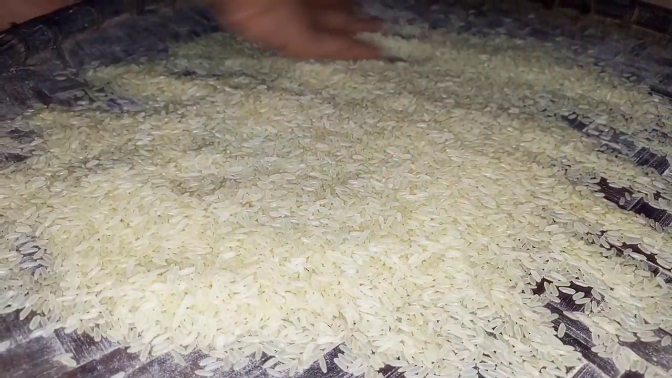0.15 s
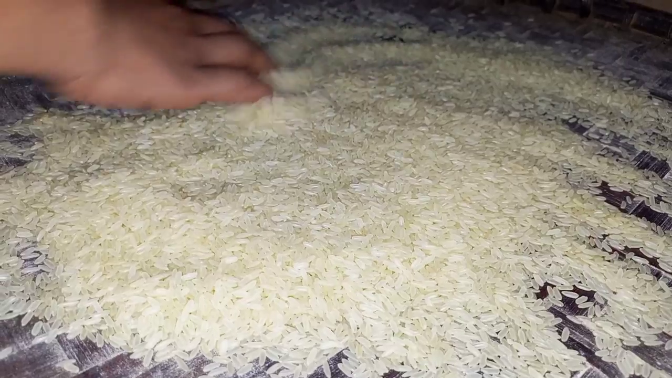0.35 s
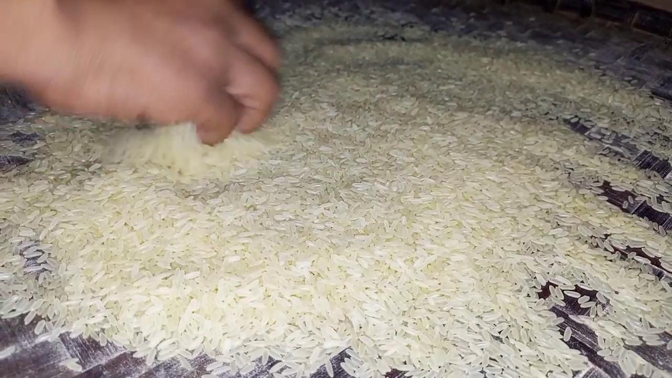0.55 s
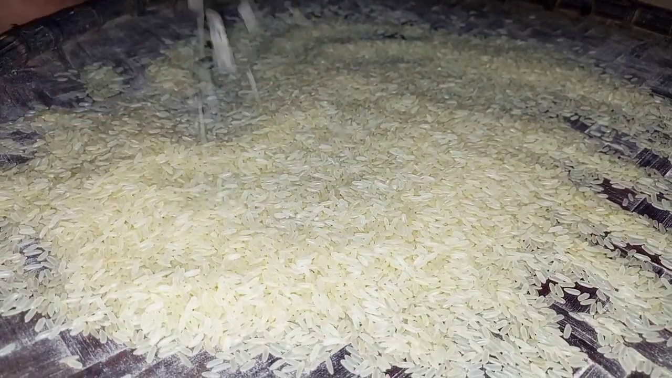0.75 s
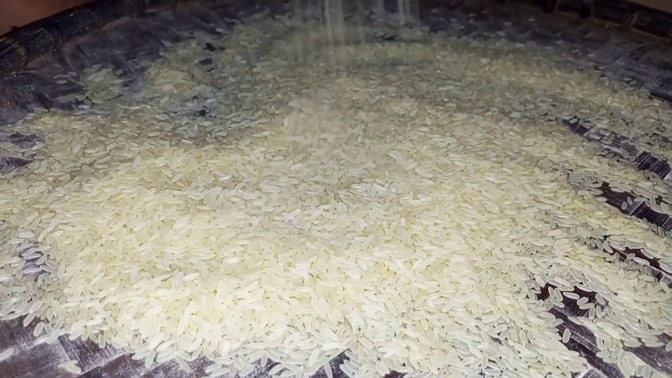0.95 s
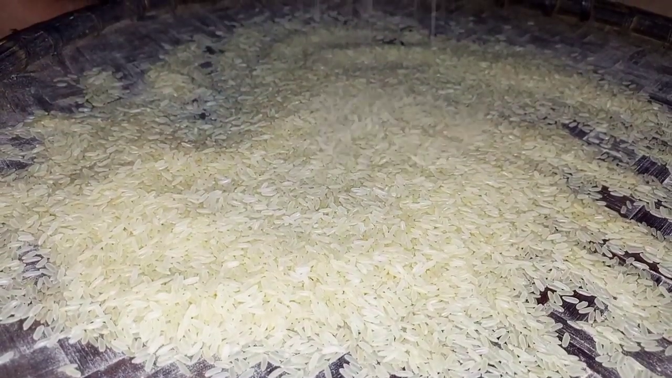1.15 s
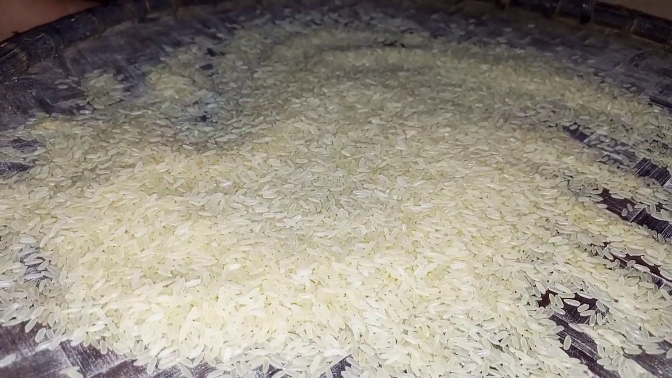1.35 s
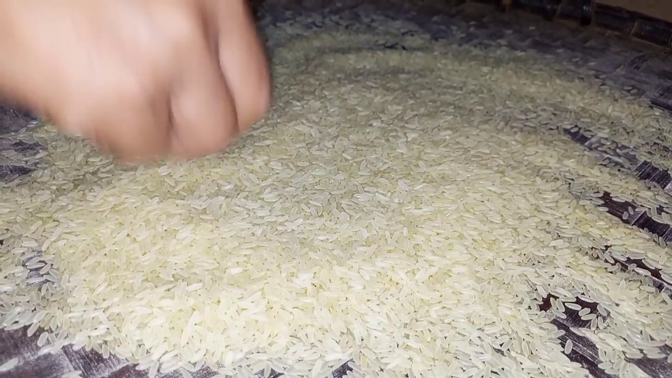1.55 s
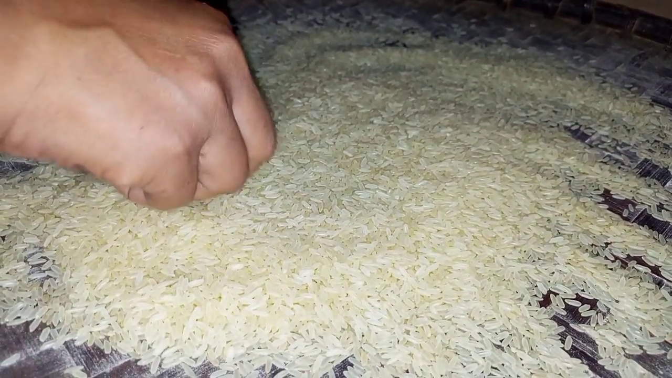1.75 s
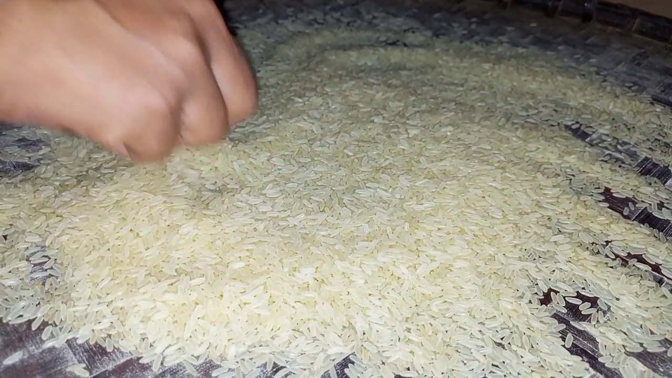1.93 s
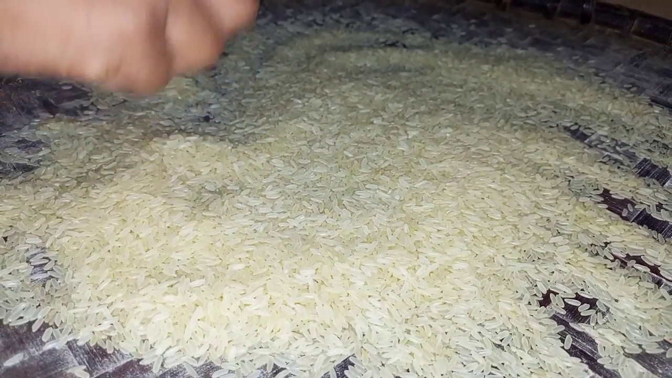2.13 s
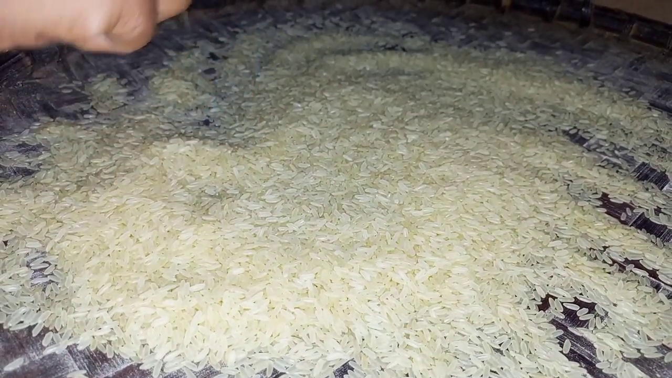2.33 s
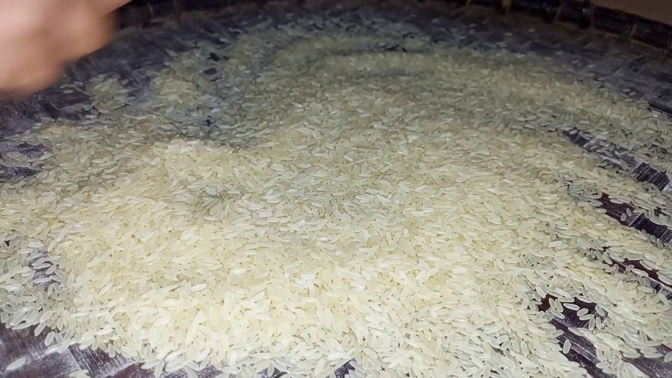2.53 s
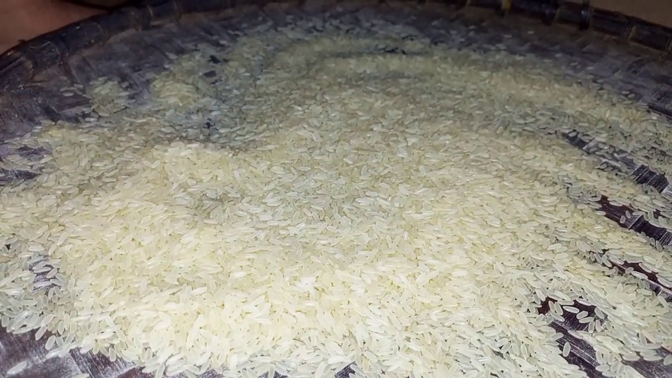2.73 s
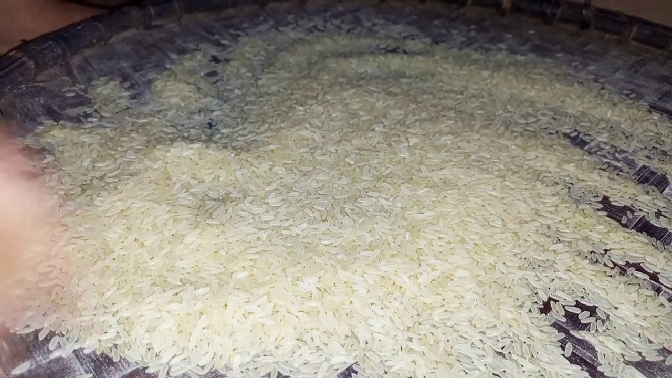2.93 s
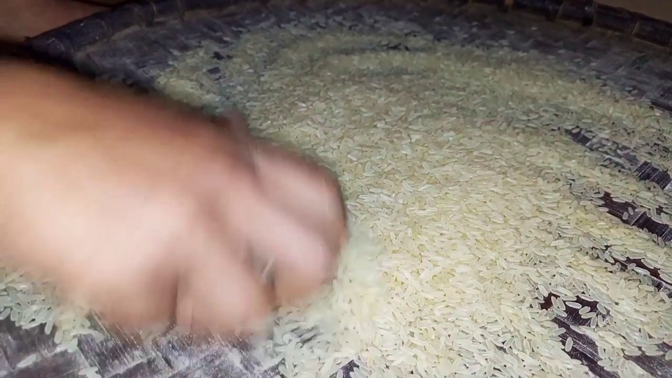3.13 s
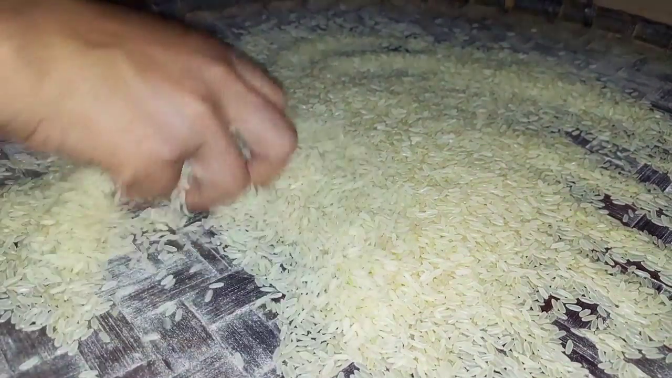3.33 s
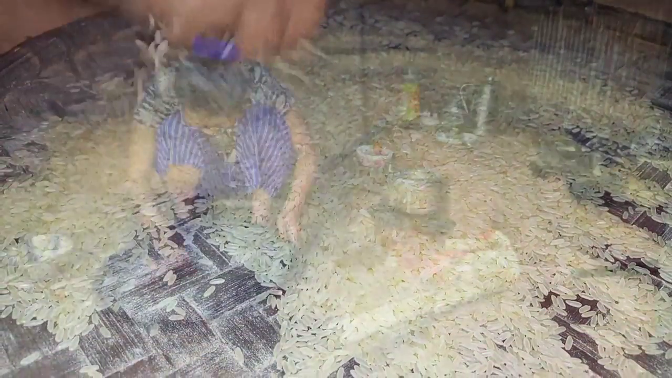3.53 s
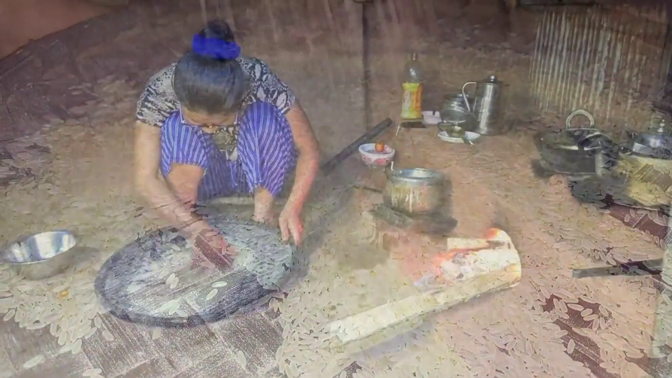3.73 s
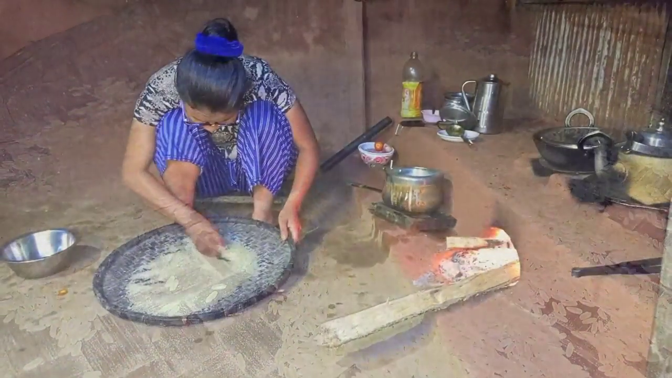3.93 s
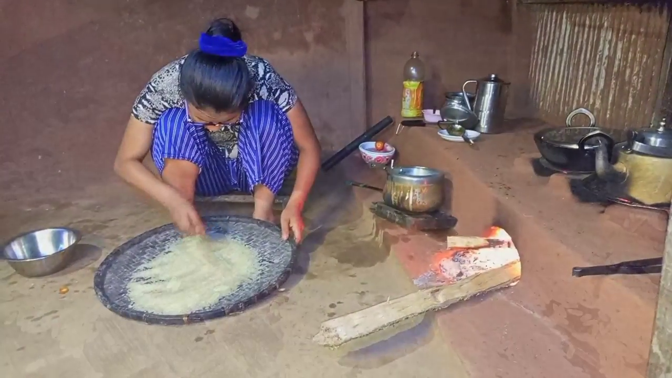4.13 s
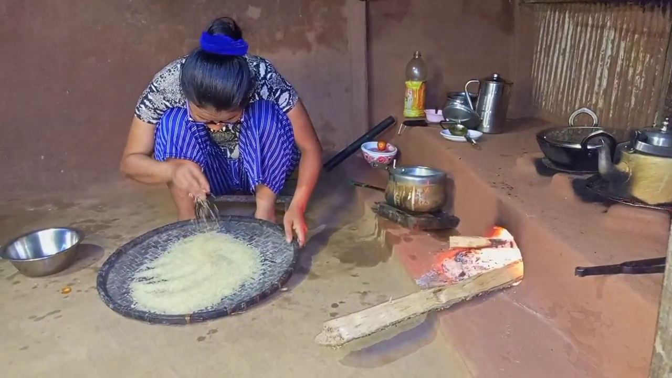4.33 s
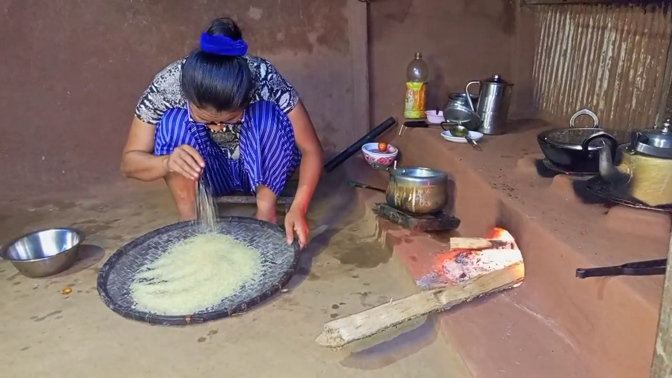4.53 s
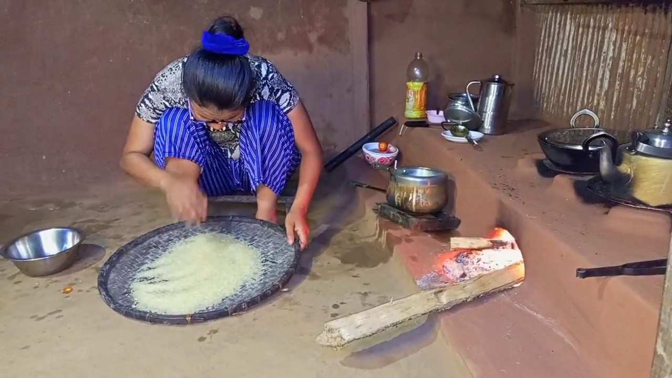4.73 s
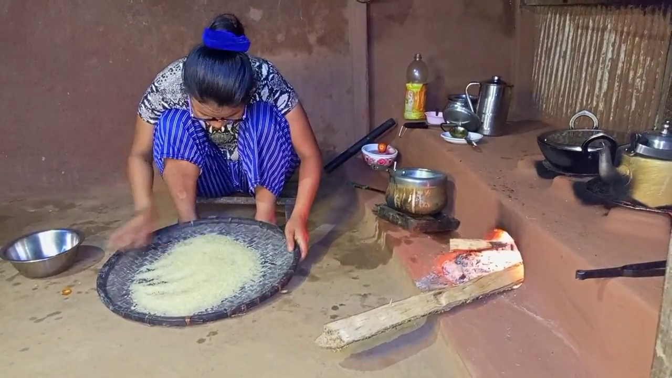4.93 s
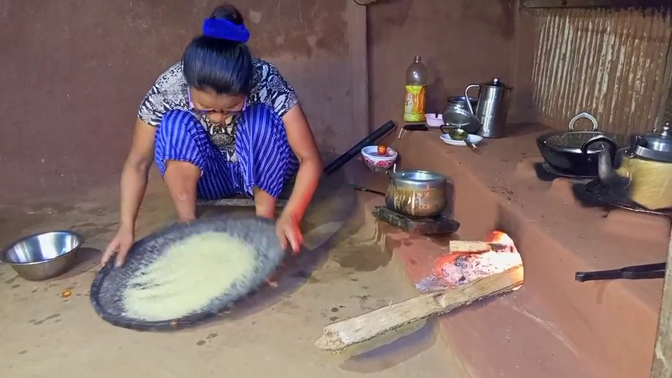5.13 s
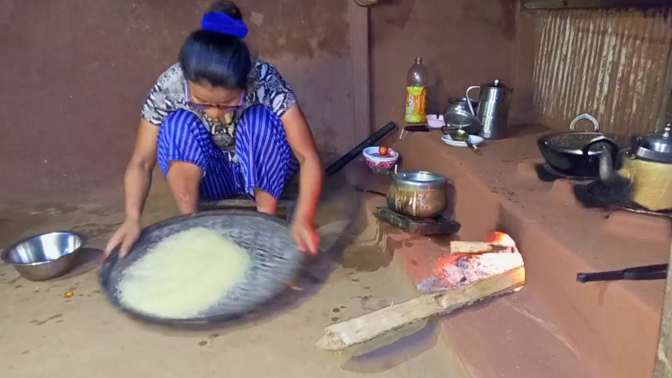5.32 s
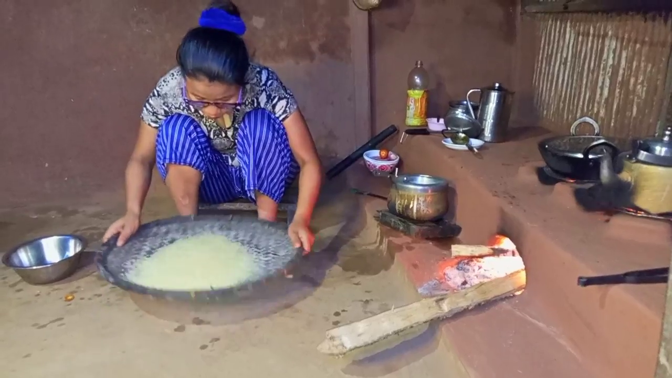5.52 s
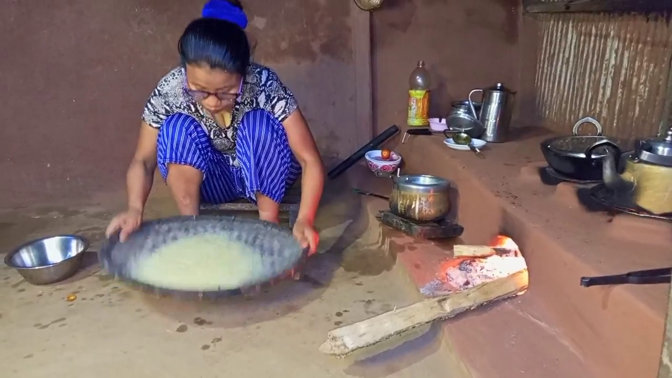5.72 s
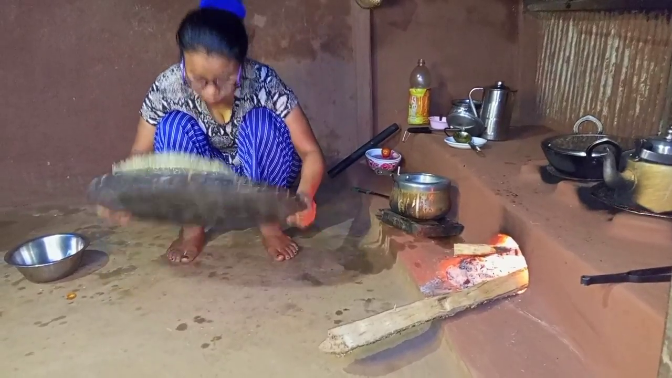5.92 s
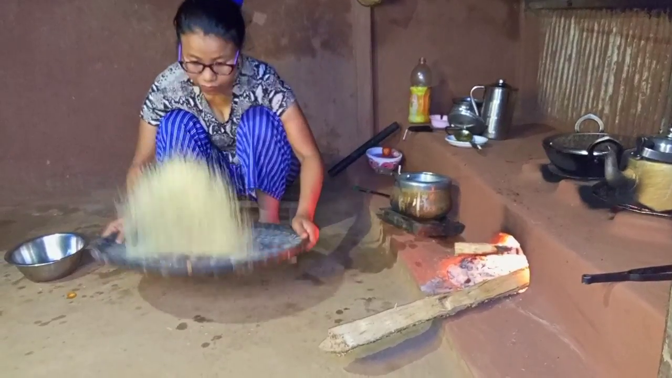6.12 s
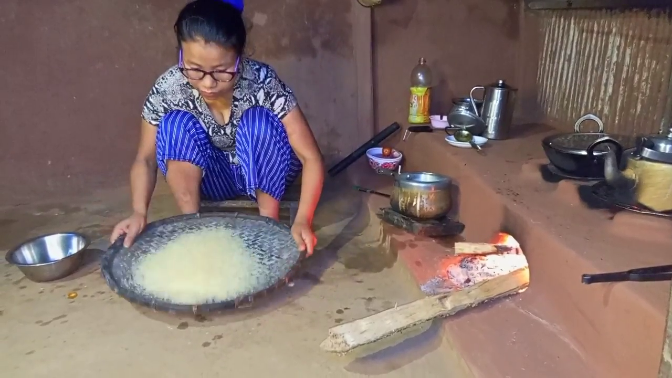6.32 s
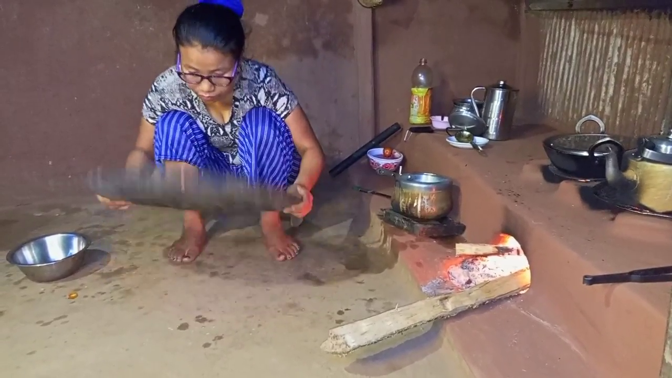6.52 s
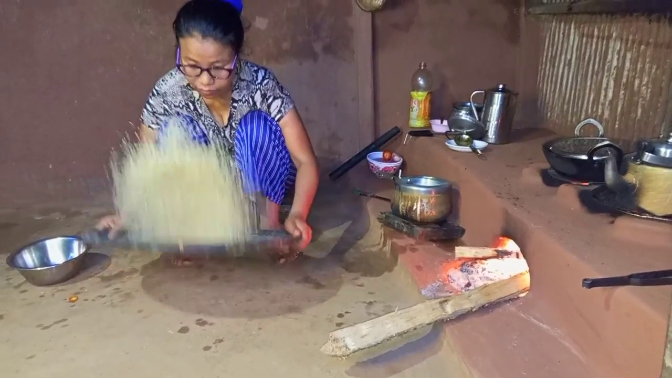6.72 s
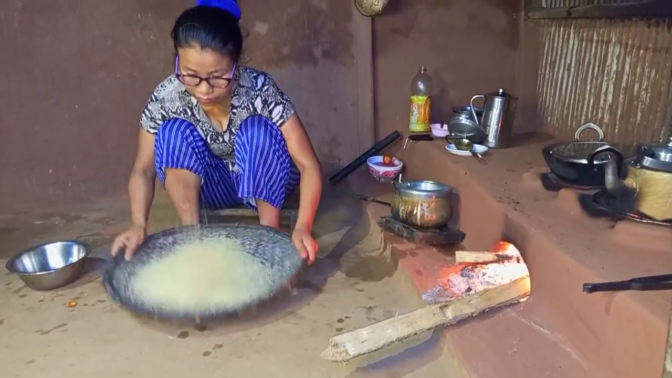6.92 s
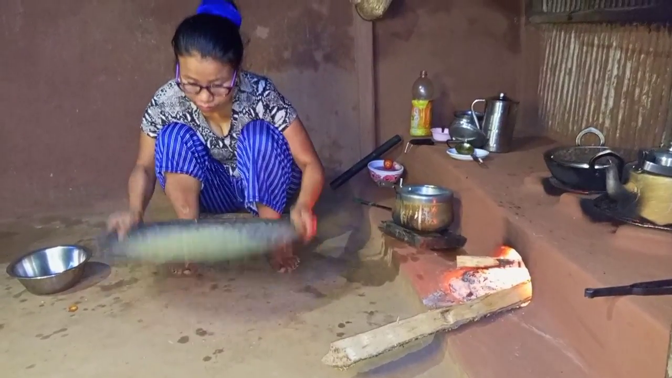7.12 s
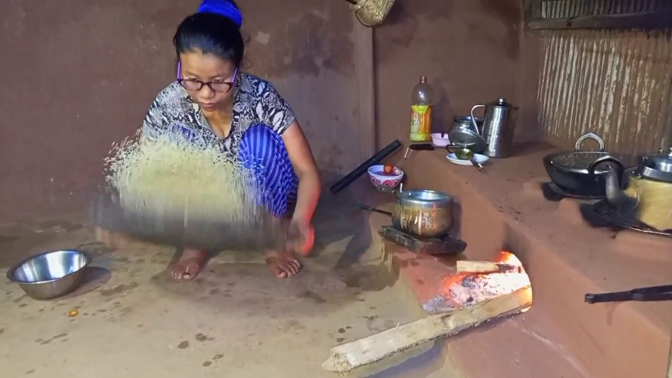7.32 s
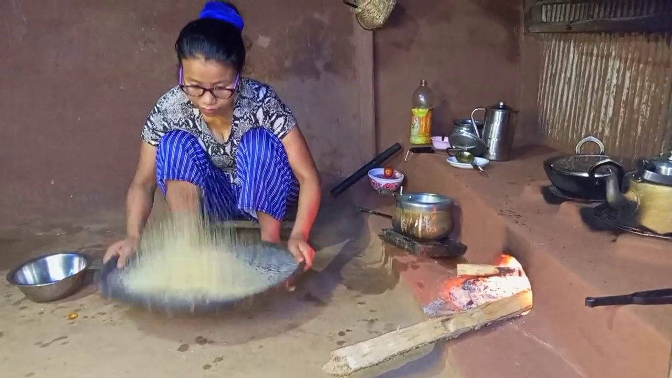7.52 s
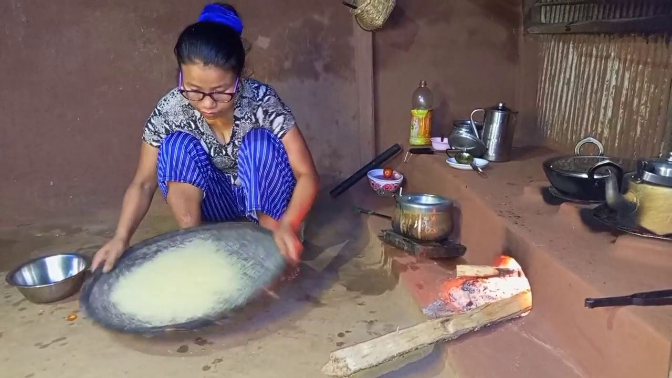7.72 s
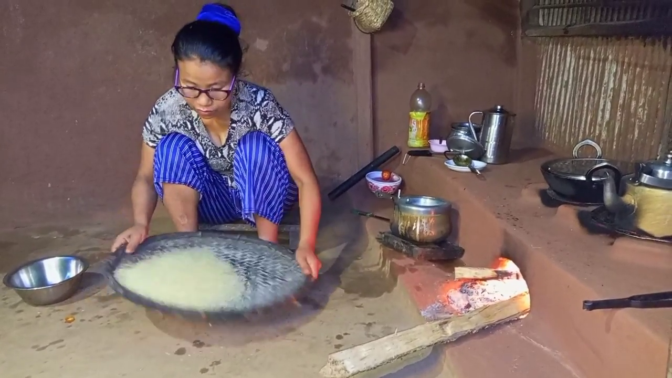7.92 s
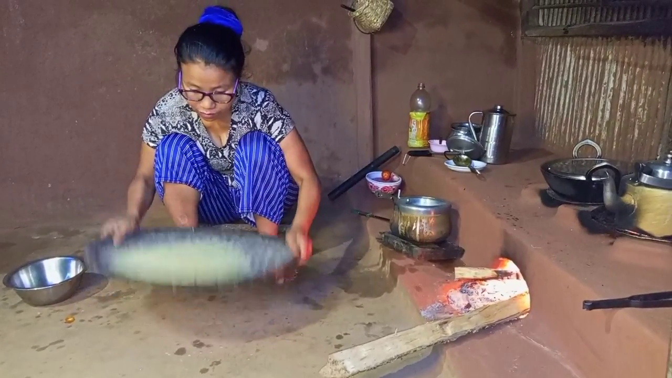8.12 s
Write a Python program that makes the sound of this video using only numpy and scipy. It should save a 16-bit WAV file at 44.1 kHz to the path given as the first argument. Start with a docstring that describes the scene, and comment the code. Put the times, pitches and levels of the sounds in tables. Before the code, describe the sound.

A hand scoops and stirs dry rice on a bamboo tray, then the grains slide and land in three bright showers in a quiet kitchen.

```python
"""Raw rice on a woven bamboo winnowing tray, in a quiet kitchen. Close up, a hand scoops the grains
and lets them trickle back. From a few steps away it stirs them and pours a fistful; then the tray is
rocked and the rice is tossed and caught three times. Each movement is a swarm of tiny clicks and pings,
coloured by heap and bamboo, that thickens as it gets louder. Single grains tick on the weave,
over faint hollow bumps and steady room tone."""
import sys
import numpy as np
from scipy import signal
from scipy.fft import rfft, irfft, next_fast_len
from scipy.io import wavfile

SR = 44100
rng = np.random.default_rng(int(sys.argv[2]) if len(sys.argv) > 2 else 0)


def generate_wav(signal):
    """Clip the signal to [-1, 1] and save it as 16-bit WAV at the path in sys.argv[1]."""
    frames = np.transpose(np.atleast_2d(signal))
    scaled = np.clip(frames, -1, 1) * 32767
    pcm = np.round(scaled).astype(np.int16)
    wavfile.write(sys.argv[1], SR, pcm)


N = 359856
TAPS = 4096
HZ = np.fft.rfftfreq(TAPS, 1 / SR)
TIME = np.arange(N) / SR
MOVE_S = 3.9  # the perspective shifts from close up to a few steps away
RELEASE_DB = 32  # drop of a rustle over its release time

# resonances of tray and microphone (hollow low ring, bright high peaks),
# close up and from a few steps away: centre_hz, width_hz, gain_db
NEAR_RESONANCES = [(420.0, 80.0, 5.9), (570.0, 100.0, 7.2), (840.0, 250.0, 14.4), (1240.0, 110.0, 7.1),
                   (1950.0, 880.0, 5.6), (5730.0, 2200.0, 20.4), (9210.0, 1760.0, 11.6),
                   (14900.0, 1110.0, 8.7)]
FAR_RESONANCES = [(370.0, 110.0, 4.4), (590.0, 80.0, 4.5), (1290.0, 110.0, 2.0), (1800.0, 230.0, 1.8),
                  (2540.0, 550.0, 5.3), (6380.0, 1300.0, 9.7), (9430.0, 2540.0, 6.3),
                  (15040.0, 1550.0, 11.9)]
# tone of one grain contact when trickling, stirred or landing: frequency_hz, gain_db
TRICKLE_EQ = [(100, -47), (250, -25), (480, -26), (750, -20.5), (1500, -1), (3000, -1.5), (4500, -16),
              (7700, -20), (11000, -12.5), (13500, -19.5), (15500, -14)]
STIR_EQ = [(100, -47), (250, -22.3), (480, -28.1), (650, -7.5), (1500, 0.0), (3000, -0.7), (4500, -1.3),
           (7700, -7.0), (11000, -7.6), (13500, -16.0), (15500, -12.1)]
LANDING_EQ = [(100, -51), (250, -25), (350, -9.5), (620, -9), (950, -12), (2500, -2), (4500, 0.5),
              (7700, -5.5), (11000, -5.5), (13500, -8.5), (15500, -10)]
# narrow modes of the lifted tray: centre_hz, width_hz, gain_db
LIFTED_MODES = [(587, 24, 5), (791, 15, 6), (1060, 36, 4), (1285, 21, 1.5)]


def amp(db):
    """Decibels to gain."""
    return 10 ** (np.asarray(db) / 20)


def unit_rms(x):
    """Scales to rms 1."""
    return x / np.sqrt(np.mean(x ** 2) + 1e-20)


def add(mix, start_s, sound):
    """Mixes a sound in at start_s."""
    part = mix[max(round(start_s * SR), 0):][:len(sound)]
    part += sound[:len(part)]


def eq_db(colour, peaks):
    """A smooth EQ curve with resonances on top, in dB over HZ."""
    hz, db = np.transpose(colour)
    slope = np.interp(np.log(HZ + 1), np.log(hz), db)
    return slope + sum(gain / (1 + (2 * (HZ - centre) / width) ** 2) for centre, width, gain in peaks)


def focus_db(hz, octaves):
    """A broad band-pass curve centred on hz."""
    return -12 * np.log10(1 + (np.log2((HZ + 1) / hz) / octaves) ** 4)


def coloured(x, curve_db):
    """Plays x through a minimum-phase EQ, so clicks keep their sharp attack."""
    log_gain = np.log(amp(np.r_[curve_db, curve_db[-2:0:-1]]))
    impulse = np.fft.ifft(np.exp(np.conj(signal.hilbert(log_gain)))).real[:TAPS // 2]
    return signal.fftconvolve(x, impulse)[:len(x)]


def split(x, hz, order=12):
    """Crossover: the parts of x below and above hz."""
    size = next_fast_len(len(x) + TAPS)
    rolloff = 1 + (np.fft.rfftfreq(size, 1 / SR) / hz) ** order
    below = irfft(rfft(x, size) / rolloff, size)[:len(x)]
    return below, x - below


def waver(t, rate_hz, order=4):
    """A smooth random modulator with rms 1."""
    return unit_rms(split(rng.standard_normal(len(t)), rate_hz, order)[0])


def contacts(t, chance):
    """Clicks of random strength, with the given chance per sample."""
    return rng.standard_normal(len(t)) * (rng.random(len(t)) < chance)


def room(x, wet_db, t60_s=0.11):
    """Adds sparse echoes from the earthen floor and walls."""
    t = TIME[:SR // 4]
    echoes = rng.choice([-1., 1.], len(t)) * (rng.random(len(t)) < .06)
    echoes *= amp(-60 * t / t60_s) * (t > .002)
    echoes *= amp(wet_db) / np.linalg.norm(echoes)
    echoes[0] = 1
    return signal.fftconvolve(x, echoes)


def room_tone(colour, level_db, flutter_db):
    """Steady kitchen air; its rumble, whine and hiss each waver on their own."""
    # whining resonances in the air: centre_hz, width_hz, gain_db
    whine_peaks = [(1233, 88, 10.2), (2422, 144, 14.6), (15200, 1400, 9.2)]
    noise = coloured(rng.standard_normal(N + TAPS), eq_db(colour, whine_peaks))[TAPS:]
    rumble, upper = split(unit_rms(noise), 700)
    whine, hiss = split(upper, 3200)
    out = np.zeros(N)
    for band, depth_db, rate_hz in [(rumble, 2 * flutter_db, 7), (whine, 1.5, 6), (hiss, flutter_db, 20)]:
        out += band * amp(level_db + depth_db * waver(TIME, rate_hz))
    return out


def kitchen(crossfade_s=0.47):
    """The room tone crossfades from beside the tray to a few steps away."""
    # tone of the air at each place: frequency_hz, gain_db
    near_eq = [(40, -18), (90, -10), (170, -2), (270, -10.5), (410, -4.5), (600, -17.5), (1600, -16.5),
               (3000, -13.5), (4000, -13.5), (5300, -1.5), (6800, -16.5), (9500, -19), (13000, -34.5),
               (15500, -27)]
    far_eq = [(40, -13), (90, -4.5), (170, -2.5), (270, -2.5), (410, -6.5), (600, -12), (1600, -15),
              (3000, -1.5), (4000, -9.5), (5300, -3.5), (6800, -3.5), (9500, -8.5), (13000, -20),
              (15500, -23)]
    near = room_tone(near_eq, level_db=-66.5, flutter_db=0.4)
    far = room_tone(far_eq, level_db=-65.5, flutter_db=0.74)
    away = np.clip((TIME - MOVE_S) / crossfade_s + .5, 0, 1)
    return (1 - away) * near + away * far


def bumps():
    """Soft, low, hollow tones that swell and fade with an unsteady pitch."""
    # faint bumps and hums: centre_s, peak_db, pitch_hz, length_s
    hums = [(0.453, -57, 402, 0.17), (1.571, -67, 495, 0.082), (1.69, -66, 169, 0.075),
            (4.3, -65, 615, 0.17), (4.53, -67, 207, 0.17), (4.92, -68, 240, 0.11), (5.14, -63, 153, 0.16),
            (5.24, -59.5, 169, 0.064), (5.6, -65, 159, 0.15), (5.78, -68.5, 163.5, .14),
            (6.58, -70, 158, 0.16)]
    out = np.zeros(N)
    for centre, db, hz, length in hums:
        t = np.arange(0, length, 1 / SR)
        pitch_hz = hz * (1 + 0.038 * waver(t, 32))
        tone = np.sin(2 * np.pi * np.cumsum(pitch_hz) / SR)
        add(out, centre - length / 2, amp(db) * np.hanning(len(t)) * tone)
    return out


def ticks(trim_db=-20.5, bounce=0.62, bounce_s=0.0047, snap_lift_db=6.0):
    """A grain strikes the weave, rings one bamboo strip and chatters for a few milliseconds."""
    # single grains and clumps hitting the tray: start_s, level_db, pitch_hz, snap_db
    hits = [(0.907, -46, 1780, -18), (0.993, -36, 1770, -23), (1.016, -31.5, 2030, -12),
            (1.088, -39, 2020, -20), (1.101, -29, 1640, -26), (1.138, -30.5, 1620, -11),
            (1.302, -23, 1890, -13.5), (1.34, -26.5, 1490, -16), (1.402, -33, 1640, -14),
            (1.885, -44, 2040, -11), (2.554, -30, 1760, -29), (3.306, -15.5, 1100, -16),
            (3.376, -18.5, 1110, -15), (3.633, -23.5, 1800, -11.5), (3.672, -27, 1730, -10.5),
            (3.734, -26, 1690, -22), (3.779, -32.5, 2340, -23), (3.82, -31, 1250, -18),
            (3.91, -29.5, 1300, -5.5), (4.518, -46, 2490, -3), (4.557, -41, 1700, 0),
            (4.589, -44, 2390, -21), (5.224, -39, 2970, -25), (5.819, -49, 2920, -16),
            (7.305, -47, 3300, -4)]
    # modes of a struck bamboo strip: pitch_ratio, width_hz, gain_db
    strip_modes = [(1, 300, 13), (1.33, 300, 5), (1.54, 280, 0), (3.15, 600, 11)]
    out, t = np.zeros(N), TIME[:SR // 50]
    for start, db, hz, snap_db in hits:
        clicks = bounce * contacts(t, .08) * np.exp(-t / bounce_s)
        clicks[0] = 1  # the first impact
        strip = [(ratio * hz, width, gain) for ratio, width, gain in strip_modes]
        resonances = NEAR_RESONANCES if start < MOVE_S else FAR_RESONANCES
        colour_db = eq_db(TRICKLE_EQ, [*resonances, *strip])
        knock = coloured(clicks, colour_db + focus_db(1.1 * hz, octaves=1.2))
        snap = split(coloured(clicks, colour_db), 7500)[1]
        tick = unit_rms(knock) + unit_rms(snap) * amp(snap_db + snap_lift_db)
        add(out, start, room(amp(db + trim_db) * tick, wet_db=-5.5))
    return out


def pings(t, per_s, ring_s, low_hz=700, high_hz=15500):
    """Loose grains bounce on the bamboo; each rings briefly at its own pitch."""
    age = TIME[:SR // 45]
    count = max(int(per_s * t[-1]), 1)
    when, pitch, force, sign = rng.random((6000, 4))[:count].T[:, :, None]
    hz = low_hz * (high_hz / low_hz) ** pitch
    strength = np.sign(sign - .5) * np.sqrt(-hz * np.log(force))
    rings = strength * np.sin(2 * np.pi * hz * age) * np.exp(-age / ring_s)
    places = (when * len(t)).astype(int) + np.arange(len(age))
    return np.bincount(places.ravel(), rings.ravel())[:len(t)]


def movement(attack_s, hold_s, release_s, swell_db, onset_db, body_lag_s, curve,
             body_follow, fizz_follow, fizz_lead_s=0):
    """Rustle, body and fizz envelopes in dB; the weight of the heap follows the first loose grains."""
    t = np.arange(0, hold_s + 1.4 * release_s, 1 / SR)
    swell = swell_db * np.minimum(t / hold_s - 1, 0)
    rise, body_rise = (-onset_db * np.exp(-np.maximum(t - lag, 0) / attack_s) for lag in (0, body_lag_s))
    fall, fizz_fall = (-RELEASE_DB * (np.maximum(t - end, 0) / release_s) ** curve
                       for end in (hold_s, hold_s - fizz_lead_s))
    rustle = rise + swell + fall
    body = body_rise + body_follow * (swell + fall)
    fizz = rise + fizz_follow * (swell + fizz_fall)
    return rustle, body, fizz


def rice(envelopes, levels_db, colour, peaks, clicks_per_s, pings_per_s, ping_db, ring_s,
         clump_db, weight, full_db, wet_db):
    """Colliding grains, denser when louder: body of heap and tray, rustle of grains, fizz of husks."""
    rustle_db, body_db, fizz_db = (envelope + db for envelope, db in zip(envelopes, levels_db))
    t = TIME[:len(rustle_db)]
    density = amp(np.maximum(envelopes[0], -RELEASE_DB) / 2)
    chance = np.minimum(clicks_per_s / SR * density, 1)
    grains = contacts(t, chance) / np.sqrt(chance)
    grains += amp(ping_db) * unit_rms(pings(t, pings_per_s, ring_s))
    # grains give way in small clumps, a few milliseconds each
    grains *= amp(clump_db * waver(t, 90, order=2))
    sound = room(coloured(grains, eq_db(colour, peaks)), wet_db)[:len(t)]
    body, upper = split(sound, 1300, order=24)
    rustle, fizz = split(upper, 7500, order=24)
    # the lowest tray modes come up as the full weight of the rice moves
    deep, hollow = split(unit_rms(body), 557, order=8)
    body = hollow + deep * amp(weight * (body_db - full_db))
    return body * amp(body_db) + unit_rms(rustle) * amp(rustle_db) + unit_rms(fizz) * amp(fizz_db)


def trickles(body_db=-14.5, fizz_db=-13):
    """Close up, a thin fall of grains from the lifted fist."""
    # falls of grains: start_s, hold_s, swell_db, rustle_db
    falls = [(0.894, 0.1, 2, -62), (1.014, .31, 10, -41.5), (1.835, 0.057, 2, -62)]
    out = np.zeros(N)
    for start, hold, swell_db, db in falls:
        envelopes = movement(attack_s=0.0031, hold_s=hold, release_s=.24, swell_db=swell_db, onset_db=8,
                             body_lag_s=0.0036, curve=1.16, body_follow=1.0, fizz_follow=1.05)
        add(out, start, rice(envelopes, (db, db + body_db, db + fizz_db), TRICKLE_EQ, NEAR_RESONANCES,
                             clicks_per_s=9100, pings_per_s=2400, ping_db=-0.5, ring_s=0.0035,
                             clump_db=.6, weight=.2, full_db=-60, wet_db=-7.0))
    return out


def pours(body_db=-15, fizz_db=-5.5, loud_db=-39, fizz_follow=1.18):
    """A fistful is poured back; the thicker the stream, the brighter it is."""
    # the stream thickens as the fist opens: start_s, hold_s, swell_db, rustle_db
    streams = [(4.427, 0.11, -0.5, -58.5), (4.524, 0.14, 1.5, -48), (4.635, .15, 2, -39)]
    # resonances the thin stream brings out: centre_hz, width_hz, gain_db
    stream_peaks = [(2330, 450, 3), (6120, 250, 9)]
    out = np.zeros(N)
    for start, hold, swell_db, db in streams:
        envelopes = movement(attack_s=0.014, hold_s=hold, release_s=0.11, swell_db=swell_db, onset_db=27,
                             body_lag_s=0.0046, curve=1.64, body_follow=0.86, fizz_follow=fizz_follow)
        levels_db = db, db + body_db, loud_db + fizz_db + fizz_follow * (db - loud_db)
        add(out, start, rice(envelopes, levels_db, STIR_EQ, [*FAR_RESONANCES, *stream_peaks],
                             clicks_per_s=5000, pings_per_s=1800, ping_db=-0.5, ring_s=0.0022,
                             clump_db=0, weight=0.26, full_db=-56, wet_db=-1.5))
    return out


def stirs(body_db=-15.5, fizz_db=-6.0):
    """From a few steps away, the hand sweeps through the heap."""
    # sweeps of the hand: start_s, hold_s, swell_db, rustle_db
    sweeps = [(3.649, .42, 7.5, -43), (4.208, .07, -6, -55.5)]
    out = np.zeros(N)
    for start, hold, swell_db, db in sweeps:
        envelopes = movement(attack_s=.016, hold_s=hold, release_s=.22, swell_db=swell_db, onset_db=17,
                             body_lag_s=.006, curve=1.16, body_follow=1.0, fizz_follow=0.91)
        add(out, start, rice(envelopes, (db, db + body_db, db + fizz_db), STIR_EQ, FAR_RESONANCES,
                             clicks_per_s=14000, pings_per_s=2600, ping_db=-6, ring_s=0.0052,
                             clump_db=0.2, weight=0.45, full_db=-47, wet_db=-10))
    return out


def scoops():
    """Close up, the fingers dig in quickly and draw out of the heap slowly."""
    # digs into the heap: start_s, attack_s, hold_s, release_s, swell_db, rustle_db, body_db, fizz_db
    digs = [(0.204, 0.011, 0.44, .223, 5, -33.5, -47.5, -38.5),
            (3.237, 0.023, .12, .43, -3, -31.5, -41.5, -34)]
    # tone of one scooped grain contact: frequency_hz, gain_db
    scoop_eq = [(100, -33), (250, -32), (480, -21), (750, -22.5), (1500, -1.5), (3000, 1), (4500, -9.5),
                (7700, -16), (11000, -10), (13500, -16), (15500, -9.5)]
    # extra mid-range colour of the scooping rustle: centre_hz, width_hz, gain_db
    scoop_peaks = [(790, 71, 2.5), (1180, 290, -1), (1660, 240, 6)]
    out = np.zeros(N)
    for start, attack, hold, release, swell_db, *levels_db in digs:
        envelopes = movement(attack, hold, release, swell_db, onset_db=23,
                             body_lag_s=0.0036, curve=1.53, body_follow=1.3, fizz_follow=1.25)
        add(out, start, rice(envelopes, levels_db, scoop_eq, [*NEAR_RESONANCES, *scoop_peaks],
                             clicks_per_s=36000, pings_per_s=4900, ping_db=-4.0, ring_s=0.0029,
                             clump_db=0.65, weight=1.0, full_db=-38, wet_db=-11))
    return out


def slides(body_db=-17.0, fizz_db=-4.0, loud_db=-29, fizz_follow=1.47):
    """The heap slides across the rocked tray; a gentle slide has little fizz."""
    # tilts of the tray: start_s, attack_s, hold_s, rustle_db
    tilts = [(5.197, 0.0075, 0.032, -51.5), (5.308, 0.021, 0.27, -29.5), (5.789, 0.0065, .035, -63),
             (7.801, 0.017, 0.32, -29)]
    # tone of one sliding grain contact: frequency_hz, gain_db
    slide_eq = [(100, -42), (250, -27), (350, -17), (620, -7), (950, -11), (2500, 0.5), (4500, 2),
                (7700, -6), (11000, -8), (13500, -15), (15500, -13.5)]
    out = np.zeros(N)
    for start, attack, hold, db in tilts:
        envelopes = movement(attack, hold, release_s=.158, swell_db=-0.5, onset_db=34.5,
                             body_lag_s=0.0076, curve=1.46, body_follow=0.78, fizz_follow=fizz_follow)
        levels_db = db, db + body_db, loud_db + fizz_db + fizz_follow * (db - loud_db)
        add(out, start, rice(envelopes, levels_db, slide_eq, [*FAR_RESONANCES, *LIFTED_MODES],
                             clicks_per_s=30000, pings_per_s=2900, ping_db=-10.0, ring_s=0.0053,
                             clump_db=0.1, weight=0.48, full_db=-44.0, wet_db=-13.5))
    return out


def flicks(clicks_per_s=8000, ring_width_hz=280):
    """A short skid of grains as the rice leaves the tray; the flexed bamboo rings with it."""
    # skids off the weave: start_s, level_db, rise_s, decay_s, centre_hz, ring_hz, ring_db
    skids = [(5.976, -51.5, 0.017, 0.036, 6300, 3960, 6), (6.635, -53.5, 0.0075, 0.021, 8500, 9200, 12),
             (7.303, -52, 0.0029, 0.014, 3600, 3280, 16), (7.319, -52, 0.0068, 0.025, 8200, 9190, 5)]
    out, t = np.zeros(N), TIME[:SR // 8]
    for start, db, rise, decay, centre_hz, ring_hz, ring_db in skids:
        colour_db = eq_db(LANDING_EQ, [*FAR_RESONANCES, (ring_hz, ring_width_hz, ring_db)])
        skid = coloured(contacts(t, clicks_per_s / SR), colour_db + focus_db(centre_hz, octaves=0.69))
        envelope = np.minimum(t / rise, 1) * np.exp(-np.maximum(t - 2 * rise, 0) / decay)
        add(out, start, amp(db) * unit_rms(skid) * envelope)
    return out


def landings(body_db=-19.0):
    """After each toss the rice rains back onto the tray in one bright shower that stops crisply."""
    # showers of tossed rice: start_s, attack_s, hold_s, rustle_db
    showers = [(6.052, 0.015, 0.28, -30.5), (6.702, .017, 0.3, -30), (7.399, .012, 0.28, -30)]
    out = np.zeros(N)
    for start, attack, hold, db in showers:
        envelopes = movement(attack, hold, release_s=.2, swell_db=1.2, onset_db=39.5, body_lag_s=0.0099,
                             curve=3.3, body_follow=0.76, fizz_follow=0.9, fizz_lead_s=0.032)
        levels_db = db, db + body_db, db
        add(out, start, rice(envelopes, levels_db, LANDING_EQ, [*FAR_RESONANCES, *LIFTED_MODES],
                             clicks_per_s=35000, pings_per_s=4000, ping_db=-9, ring_s=0.0022,
                             clump_db=0.33, weight=1.0, full_db=-47.5, wet_db=-12.5))
    return out


def scene():
    """Handling and winnowing over the kitchen bed, the same in both ears."""
    bed = kitchen()
    hand = scoops() + trickles() + stirs() + pours()
    winnowing = slides() + flicks() + landings()
    mono = hand + winnowing + ticks() + bumps() + bed
    return np.array([mono, mono])


def record(dry, cutoff_hz=15620):
    """A steep low-pass takes off the very top."""
    lowpass = signal.firwin(511, cutoff_hz, window=("kaiser", 8), fs=SR)
    return signal.oaconvolve(dry, lowpass[None], "same")


dry = scene()
out = record(dry)
generate_wav(out)
```